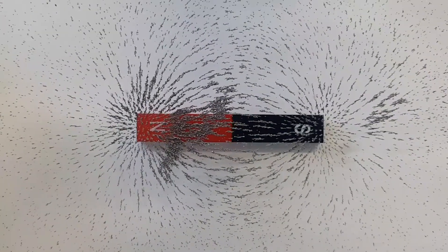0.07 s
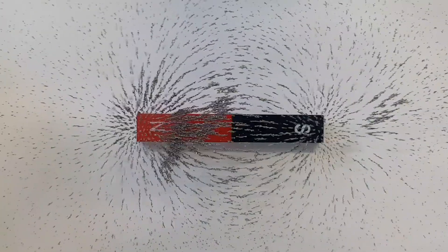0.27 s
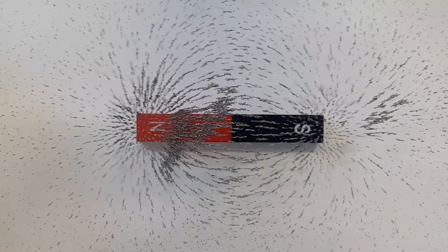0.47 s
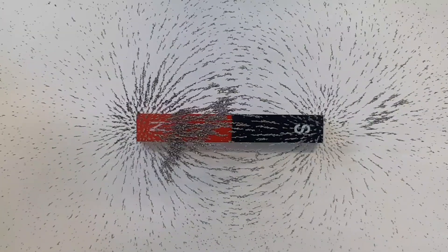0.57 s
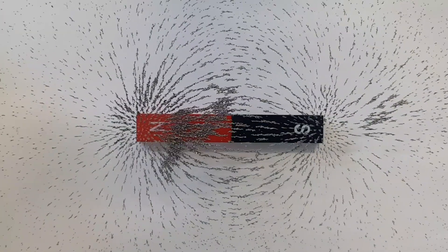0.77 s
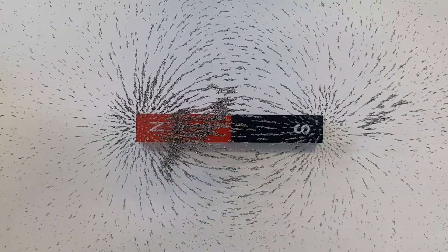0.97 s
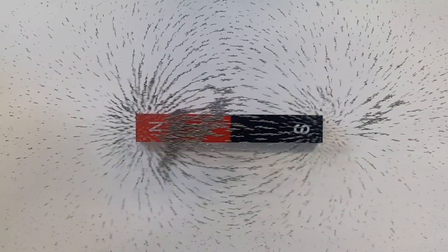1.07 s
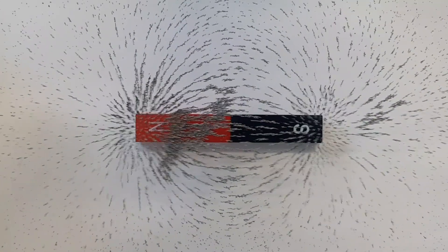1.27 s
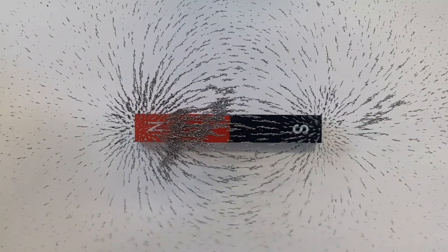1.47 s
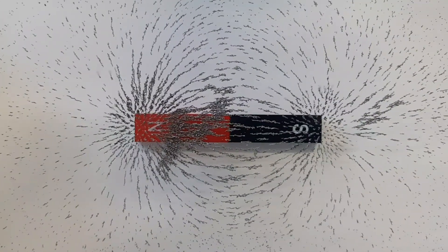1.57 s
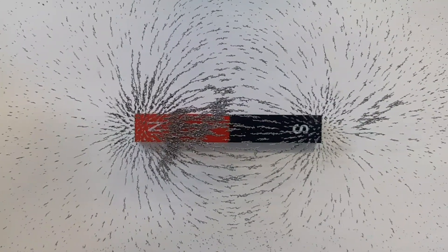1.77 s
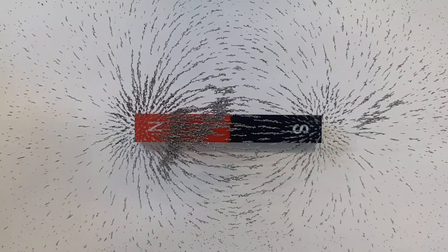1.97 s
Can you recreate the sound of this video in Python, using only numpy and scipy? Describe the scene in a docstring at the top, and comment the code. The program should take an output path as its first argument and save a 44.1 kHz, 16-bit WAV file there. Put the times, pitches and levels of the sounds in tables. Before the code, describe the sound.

Rapid soft finger taps on a thin hard sheet, with nail ticks and faint rustling metal grains.

```python
"""A finger drums about five times a second on a thin sheet lying over a magnet on a table in a quiet room.
Each tap: the soft pad lands, often the nail ticks just after, then the sheet slaps down on what lies below.
These contacts are softened clicks that ring the sheet and table and set off echoes of decaying noise.
The nail's crack and dropping iron filings are short puffs of bright noise; shaken filings rustle in fine grains.
Room rumble and microphone hiss, both made of coloured noise, lie underneath."""
import sys
import numpy as np
from scipy import signal
from scipy.fft import rfft, irfft
from scipy.io import wavfile

SR = 44100
rng = np.random.default_rng(int(sys.argv[2]) if len(sys.argv) > 2 else 0)


def ratio_of_db(decibels):
    """Turn decibels (scalar or array-like) into linear amplitude factors; 0 dB maps to 1."""
    return 10 ** (np.asarray(decibels, float) / 20)


def materialize(psi):
    """Save the field psi as 16-bit PCM at rate SR to the path in sys.argv[1].

    A 1-D psi becomes a single channel; in a 2-D psi each row is a channel.
    """
    bounded = np.clip(np.atleast_2d(psi).T, -1, 1)
    quanta = np.round(bounded * 32767).astype(np.int16)
    wavfile.write(sys.argv[1], SR, quanta)


N = 89082   # length in samples, about 2 s


def at_hz(points, hz, column=1):
    """Reads a table column at any pitch, in straight lines over log pitch."""
    p = np.array(points)
    return np.interp(np.log(hz), np.log(p[:, 0]), p[:, column])


def coloured(x, spectrum):
    """Shapes x to a spectrum that falls away outside its ends; white noise of rms 1 keeps rms 1."""
    hz = np.fft.rfftfreq(x.shape[-1], 1 / SR) + 1   # +1 avoids the log of zero
    points = [(1, -200)] + list(spectrum) + [(2 * spectrum[-1][0], -90)]
    gain = ratio_of_db(at_hz(points, hz))
    gain = gain / np.sqrt(np.mean(gain ** 2))
    return irfft(rfft(x) * gain, x.shape[-1])


def clicks(start_s, level_db):
    """One-sample clicks at the given times, over a floor too small to hear."""
    out = np.full(N, 1e-18)
    out[(np.asarray(start_s) * SR).astype(int)] = ratio_of_db(level_db)
    return out


def soften(x, cut_hz):
    """A contact takes time: four one-pole low-passes smear the click."""
    r = np.exp(-2 * np.pi * cut_hz / SR)
    two_poles = [(1 - r) ** 2, 0, 0, 1, -2 * r, r * r]
    return signal.sosfilt([two_poles] * 2, x)


def swell(x, rise_s, t60_s):
    """Every click becomes an envelope that rises, then falls by 60 dB in t60_s."""
    up = np.exp(-1 / (rise_s * SR))
    down = ratio_of_db(-60 / (t60_s * SR))
    return signal.lfilter([1 - up], np.poly([up, down]), x)


def pair(spectrum, alike):
    """Two channels of coloured noise; alike runs from 0 (unrelated) to 1 (the same)."""
    mid, side = coloured(rng.standard_normal((2, N)), spectrum)
    opposite = np.array([[1], [-1]])
    return np.sqrt((1 + alike) / 2) * mid + np.sqrt((1 - alike) / 2) * side * opposite


# spectrum of the room rumble: pitch_hz, relative level_db (per Hz)
RUMBLE_SPECTRUM = [(25, -5), (55, 10), (100, 0.5), (200, 0), (400, -13.5), (800, -27.5), (1600, -31.5),
                   (3000, -36)]
# spectrum of the hiss that both sides share: pitch_hz, relative level_db (per Hz)
SHARED_HISS_SPECTRUM = [(1500, -19), (3000, -7), (5000, -2.5), (8000, 1), (11000, -2.5), (13500, -8),
                        (15600, -3)]
# spectrum of the hiss of opposite sign in the two sides: pitch_hz, relative level_db (per Hz)
SIDE_HISS_SPECTRUM = [(60, -11), (500, -11.5), (2000, -13), (6000, -8.5), (11000, -8.5), (15600, -11)]


def background():
    """Rumble and hiss in the middle, a fainter hiss of opposite sign in the two sides."""
    rumble_db, shared_hiss_db, side_hiss_db = -63.5, -78.5, -81.5   # rms of each noise
    a, b, c = rng.standard_normal((3, N))
    rumble = ratio_of_db(rumble_db) * coloured(a, RUMBLE_SPECTRUM)
    shared_hiss = ratio_of_db(shared_hiss_db) * coloured(b, SHARED_HISS_SPECTRUM)
    side_hiss = ratio_of_db(side_hiss_db) * coloured(c, SIDE_HISS_SPECTRUM)
    return rumble + shared_hiss + side_hiss * np.array([[1], [-1]])


# the finger pad lands: start_s, level_db (of the click before softening)
PAD_LANDINGS = [(.017, -38.5), (.235, -31.5), (.452, -32), (0.662, -33), (.867, -35), (1.071, -39),
                (1.306, -39.5), (1.514, -35.5), (1.718, -38.5), (1.943, -47)]


def pad_pushes():
    """The soft finger pad pushes slowly, so its clicks are smeared more than the nail's."""
    return soften(clicks(*np.transpose(PAD_LANDINGS)), cut_hz=783)


# ringing of sheet and table: pitch_hz, t60_s (time to fall 60 dB),
# pad_db, nail_db, slap_db (how strongly each contact drives it, before random scatter)
BODY_MODES = [(59.2, 0.38, -13.5, -4, -39), (97.8, .18, -3.5, 3.5, -11.5), (152.7, 0.16, -18, 3, -36),
              (217, 0.28, -8.5, -11, -12.5), (250, 0.061, -3.5, 7, -1), (355.5, 0.1, -9, 7, -7.5),
              (474.3, 0.051, -6.5, 11, -6), (575.8, 0.037, -12, 9, -0.5), (744, 0.028, -29, 0, -10),
              (988, 0.048, -28, 2.5, -2.5), (1218, 0.045, -21, -9, 1), (1470, 0.023, -50, 10.5, -2),
              (1823, 0.022, -48, 0, -3), (2103, 0.029, -53, 13, -30.5)]


def body(pushes):
    """Pad, nail and slap strike the same modes, each with its own strengths; low modes arrive late."""
    scatter_db = 4.5
    lag_at_100_hz_s = 0.00691   # bending waves are slow in the bass: the lag shrinks with the root of pitch
    out = np.zeros(N)
    for k, (hz, t60_s, *drive_db) in enumerate(BODY_MODES):
        strengths = ratio_of_db(np.array(drive_db) + scatter_db * rng.standard_normal(3))
        push = strengths @ pushes
        # a two-pole resonator rings as a decaying sine
        r, w = ratio_of_db(-60 / (t60_s * SR)), 2 * np.pi * hz / SR
        ring = signal.lfilter([0, np.sin(w)], [1, -2 * r * np.cos(w), r * r], push)
        lag = int(lag_at_100_hz_s * np.sqrt(100 / hz) * SR)
        out[lag:] += (-1) ** k * ring[:N - lag]   # neighbouring modes have opposite signs
    return out


# echoes of the room: pitch_hz, t60_s (time to fall 60 dB), level_db
ROOM_ECHOES = [(60, 0.24, 11.5), (123, 0.33, 15.5), (250, 0.43, 23), (500, .35, 21), (900, 0.32, 22.5),
               (1450, 0.4, 24.5), (2070, 0.19, 20), (3030, 0.44, 2)]
# how strongly each contact feeds the echoes: level_db for pad, nail, slap
ECHO_FEED = [-12, 18, 9.5]


def room(pushes):
    """Echoes as noise that fades in quickly and dies band by band."""
    build_up_s = .004
    t, echo = np.arange(SR // 2) / SR, 0
    edges = 45 * 2 ** np.arange(0, 6.6, .5)   # half-octave bands, in Hz
    for low, high in zip(edges, edges[1:]):
        hz = np.sqrt(low * high)
        t60_s = at_hz(ROOM_ECHOES, hz)
        level_db = at_hz(ROOM_ECHOES, hz, column=2)
        band_pass = signal.butter(2, [low, high], "band", fs=SR, output="sos")
        band = signal.sosfilt(band_pass, rng.standard_normal(len(t)))
        even_out = np.sqrt(2 * np.log(1000) / (t60_s * SR))   # long tails get no extra energy
        echo = echo + band * ratio_of_db(level_db - 60 * t / t60_s) * even_out
    echo = echo * (1 - np.exp(-t / build_up_s))
    return signal.fftconvolve(ratio_of_db(ECHO_FEED) @ pushes, echo)[:N]


# the nail ticks: start_s, level_db (of the click before it is shaped)
NAIL_TICKS = [(0.0284, -54), (0.2459, -52), (0.4629, -51), (0.6732, -49), (0.8796, -52), (1.0825, -49),
              (1.5267, -50)]


def nail_pushes():
    """The hard nail pushes more sharply than the pad, so its clicks are smeared less."""
    return soften(clicks(*np.transpose(NAIL_TICKS)), cut_hz=2380)


# spectrum of the bright puffs: pitch_hz, relative level_db (per Hz)
PUFF_SPECTRUM = [(2600, -44.5), (3600, 6.5), (5000, -4), (7500, 4.5), (10000, -2), (13000, -17.5),
                 (15500, -20)]


def bright_puffs(start_clicks, t60_s):
    """Each click becomes a puff of bright noise, nearly the same in both sides."""
    return swell(start_clicks, 0.00043, t60_s) * pair(PUFF_SPECTRUM, alike=0.94)


def nail_cracks():
    """The nail's crack is a bright puff a few milliseconds long."""
    return ratio_of_db(0.5) * bright_puffs(clicks(*np.transpose(NAIL_TICKS)), t60_s=0.013)


# spectrum of the shaken filings: pitch_hz, relative level_db (per Hz)
RUSTLE_SPECTRUM = [(2500, 2), (4000, 0.5), (6000, -4.5), (9000, -5.5), (12000, -7), (15500, -12)]


def filings():
    """After each nail blow the filings hop: dense, slightly uneven grains swell up and fade."""
    rustle_db, grains_per_s, spread_db = -16.5, 2000, -1
    sizes = ratio_of_db(spread_db * np.minimum(rng.exponential(1, N), 5)) * rng.choice([-1, 1], N)
    hits = rng.random(N) < grains_per_s / SR
    grains = coloured(sizes * hits, RUSTLE_SPECTRUM)
    envelope = swell(clicks(*np.transpose(NAIL_TICKS)), rise_s=0.0072, t60_s=0.28)
    return ratio_of_db(rustle_db) * envelope * grains / grains.std()


# the sheet slaps down: start_s, level_db (of the click before softening), cut_hz (lower = softer contact)
SHEET_SLAPS = [(.044, -37, 250), (.262, -43.5, 250), (0.293, -43.5, 900), (0.48, -32.5, 250),
               (0.51, -40.5, 500), (.689, -36.5, 396), (0.894, -33.5, 600), (1.095, -35.5, 1210),
               (1.104, -51.5, 1200), (1.336, -37, 900), (1.541, -36, 1330), (1.747, -37.5, 1210),
               (1.774, -51, 790), (1.971, -40.5, 694), (1.974, -46, 714)]


def slap_pushes():
    """The sheet hits what lies below, each slap with its own softness."""
    return sum(soften(clicks([start_s], level_db), cut_hz) for start_s, level_db, cut_hz in SHEET_SLAPS)


# single filings drop: start_s, level_db (of the click before it is shaped)
FILING_DROPS = [(0.301, -67.5), (0.3775, -68), (0.9533, -63), (1.03, -75.5), (1.6192, -71), (1.6931, -74)]


def dropping_filings():
    """A single filing ticks as it drops: a bright puff shorter than the nail's."""
    return ratio_of_db(4) * bright_puffs(clicks(*np.transpose(FILING_DROPS)), t60_s=0.009)


def scene():
    """The contacts ring sheet, table and room; cracks, filings and background join them."""
    pushes = np.array([pad_pushes(), nail_pushes(), slap_pushes()])
    struck = body(pushes) + room(pushes)
    bright = nail_cracks() + filings() + dropping_filings()
    return struck + bright + background()


def band_limit(x):
    """A steep low-pass at the top of the band."""
    return signal.sosfilt(signal.butter(12, 16250, fs=SR, output="sos"), x)


def record(dry):
    """The deep bass is rolled off, and a steep low-pass ends the sound near 15.65 kHz."""
    bass_cut = signal.butter(3, 45.3, "high", fs=SR, output="sos")   # Hz
    top_cut = signal.cheby2(24, 50, 15650, fs=SR, output="sos")   # 50 dB down from 15650 Hz
    mix = signal.sosfilt(top_cut, signal.sosfilt(bass_cut, dry))
    return band_limit(mix)


dry = scene()
out = record(dry)
materialize(out)
```